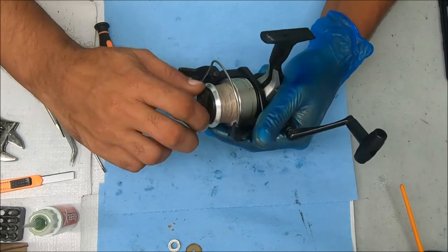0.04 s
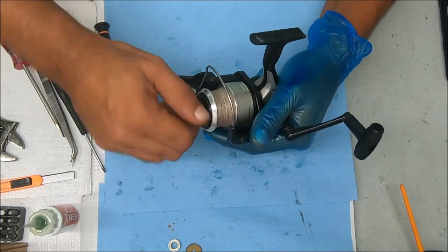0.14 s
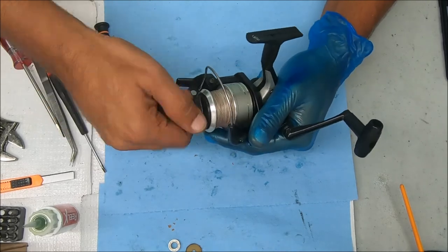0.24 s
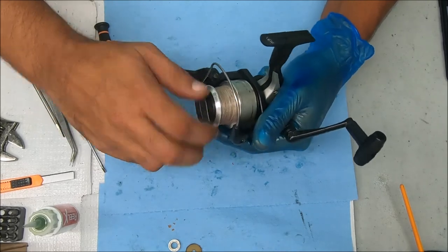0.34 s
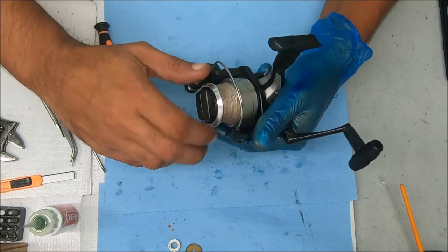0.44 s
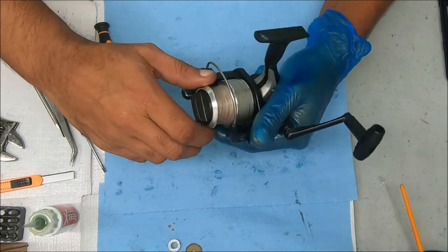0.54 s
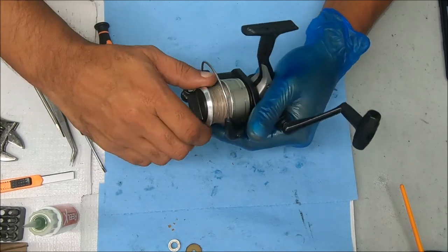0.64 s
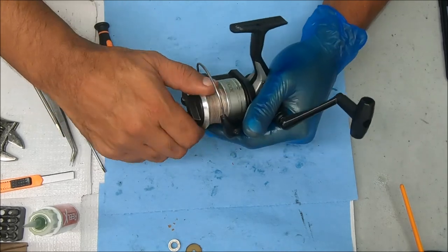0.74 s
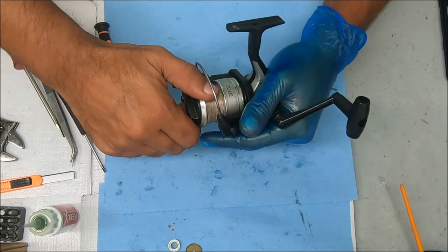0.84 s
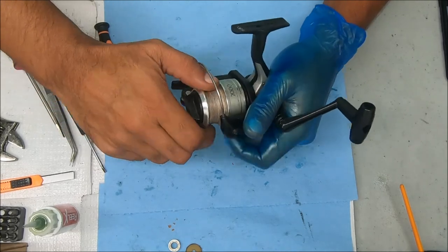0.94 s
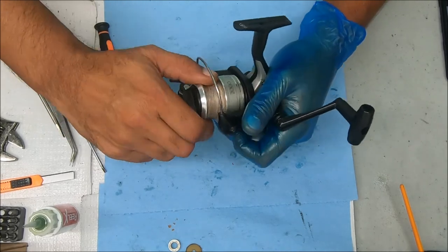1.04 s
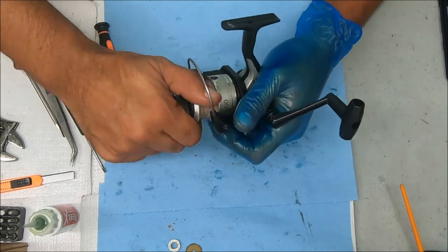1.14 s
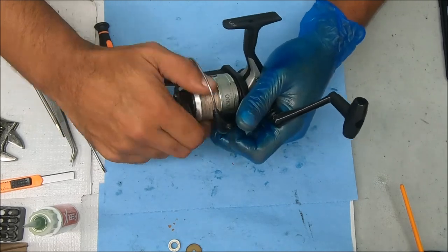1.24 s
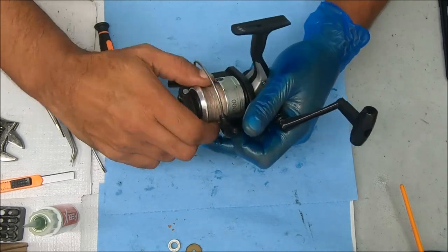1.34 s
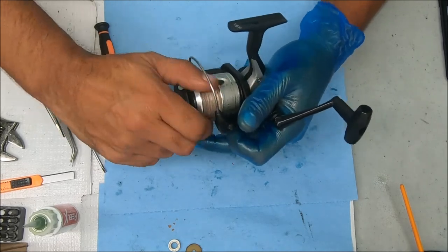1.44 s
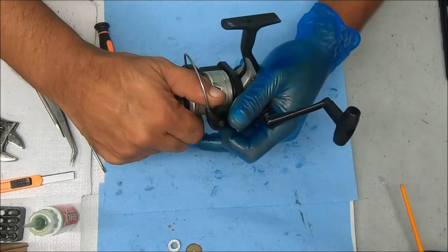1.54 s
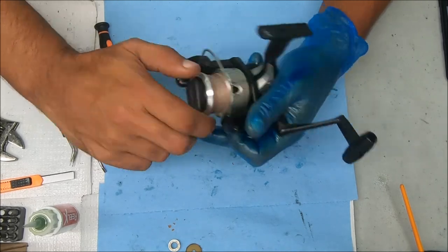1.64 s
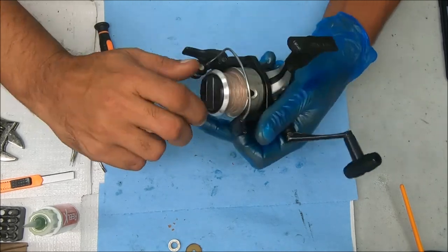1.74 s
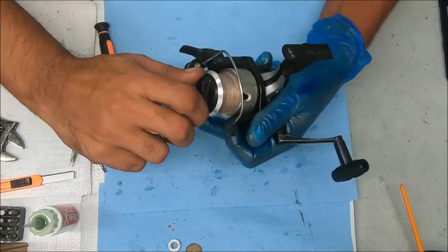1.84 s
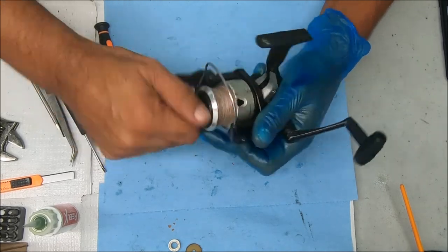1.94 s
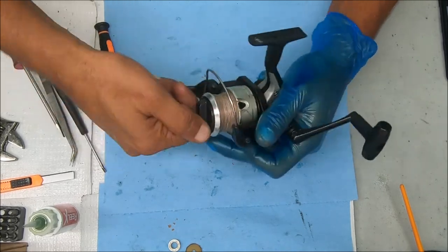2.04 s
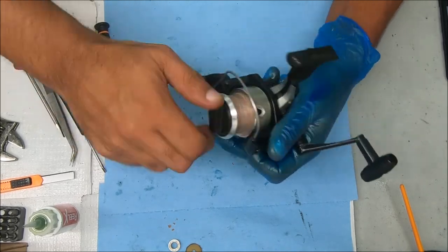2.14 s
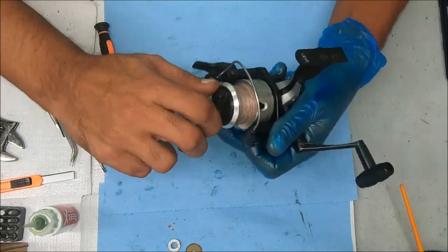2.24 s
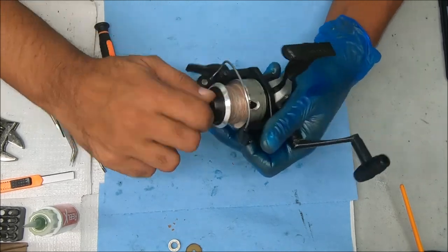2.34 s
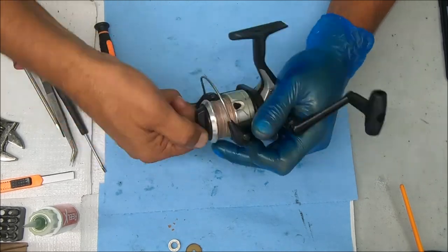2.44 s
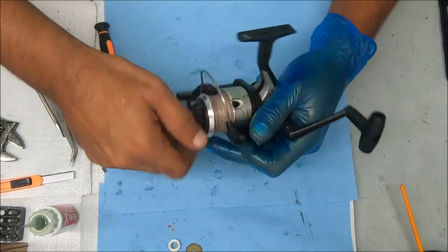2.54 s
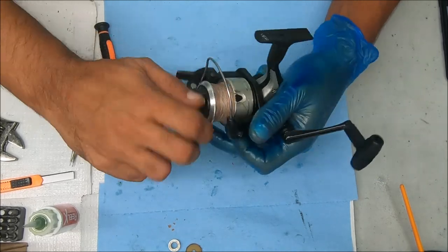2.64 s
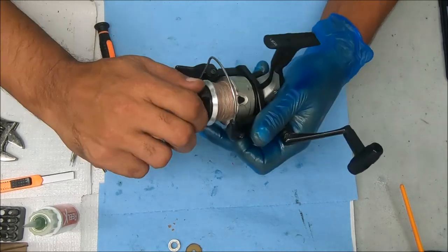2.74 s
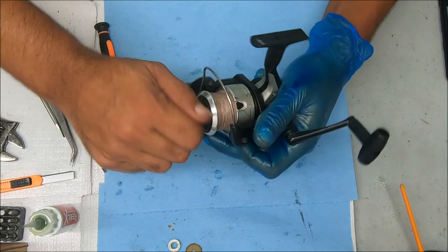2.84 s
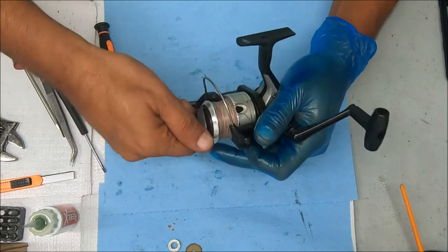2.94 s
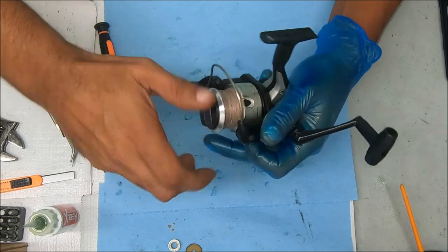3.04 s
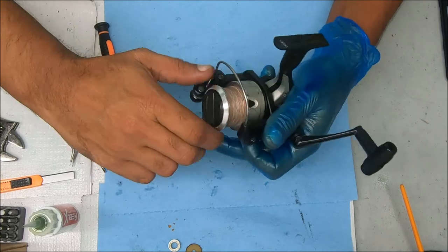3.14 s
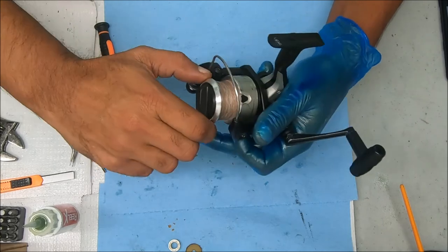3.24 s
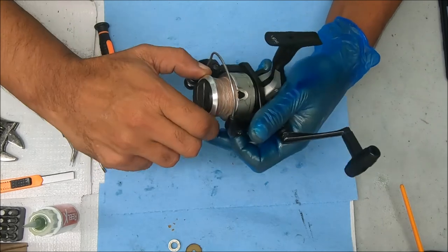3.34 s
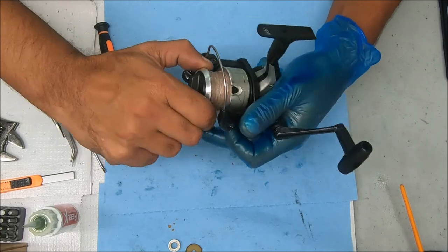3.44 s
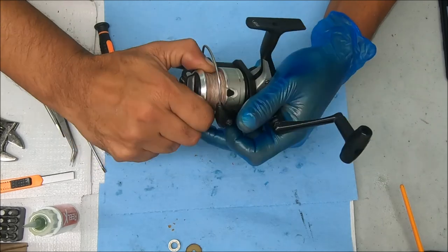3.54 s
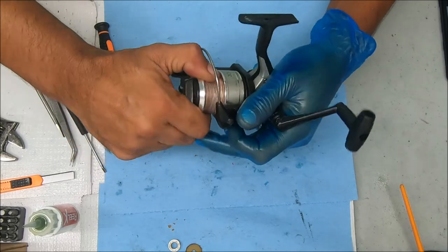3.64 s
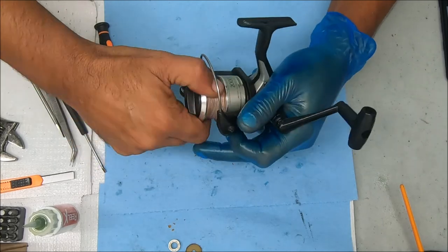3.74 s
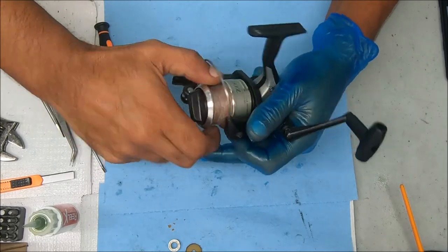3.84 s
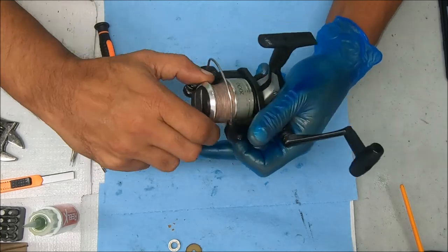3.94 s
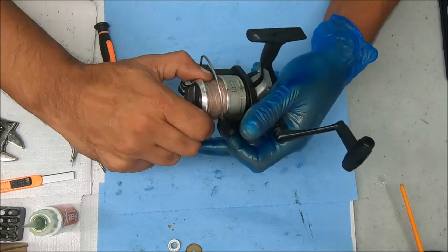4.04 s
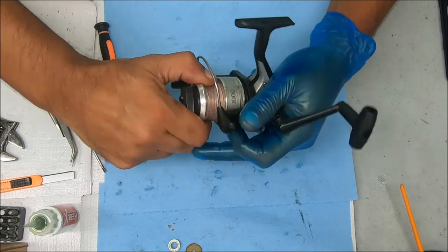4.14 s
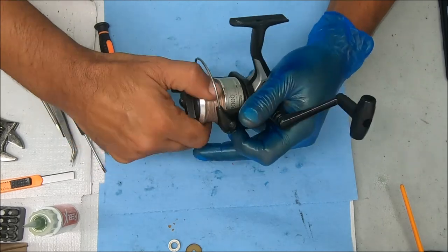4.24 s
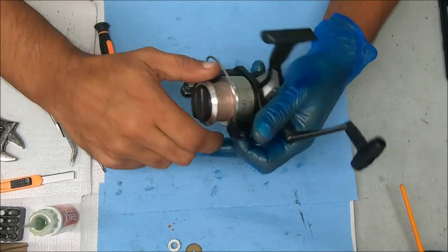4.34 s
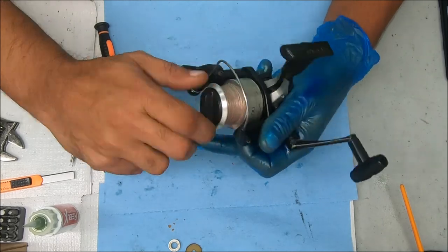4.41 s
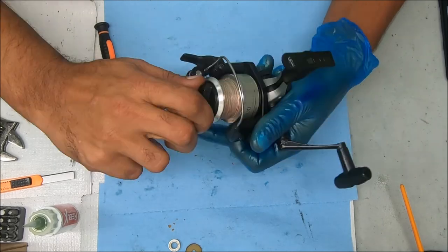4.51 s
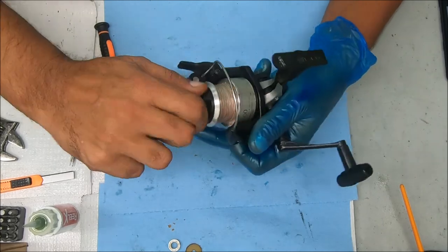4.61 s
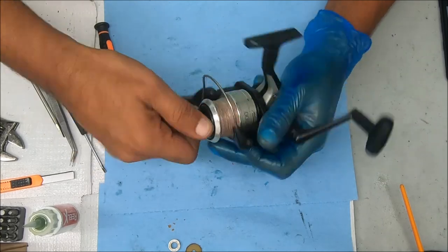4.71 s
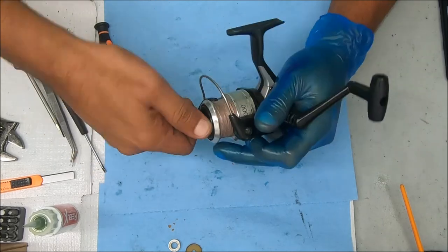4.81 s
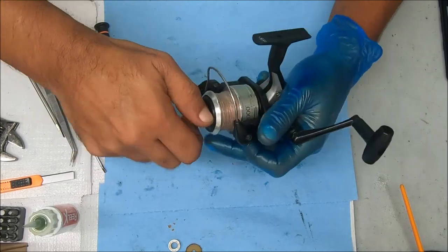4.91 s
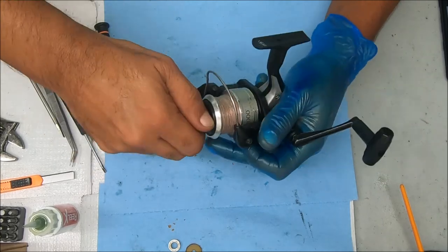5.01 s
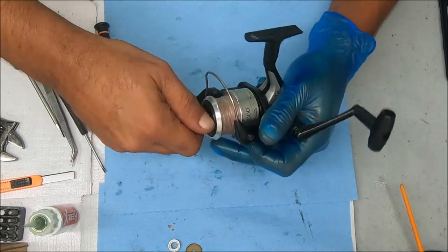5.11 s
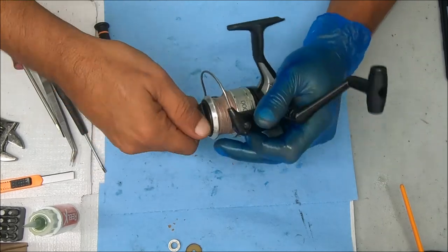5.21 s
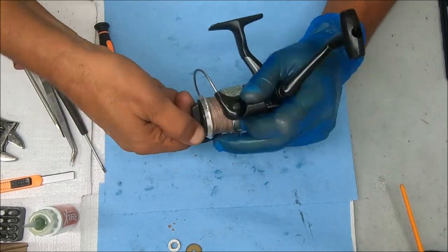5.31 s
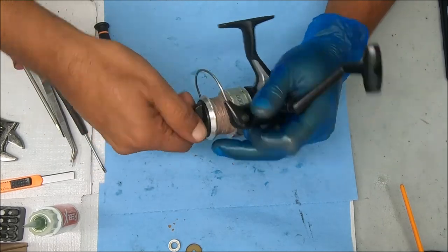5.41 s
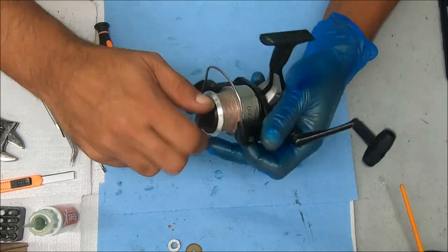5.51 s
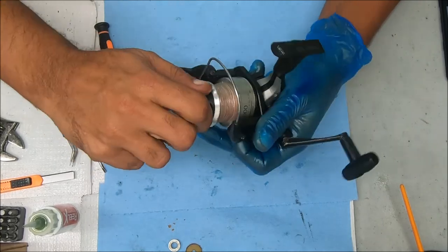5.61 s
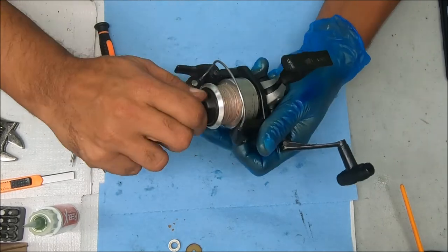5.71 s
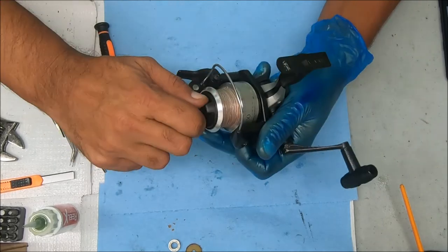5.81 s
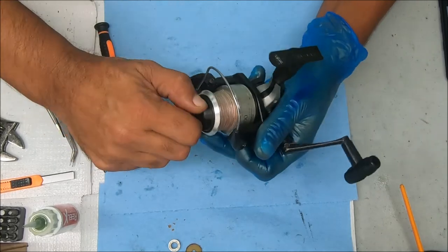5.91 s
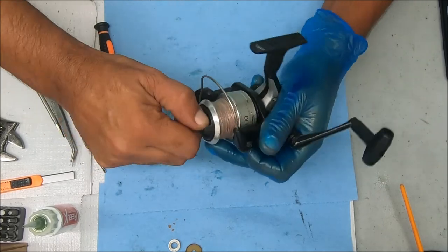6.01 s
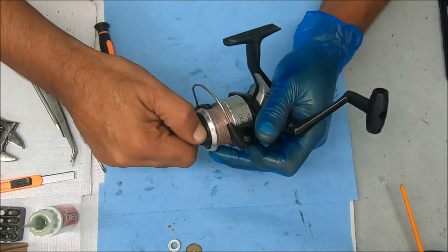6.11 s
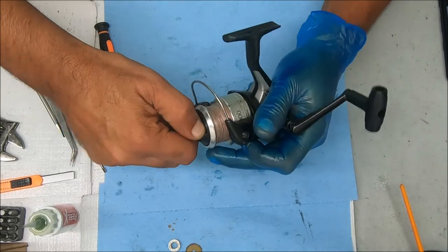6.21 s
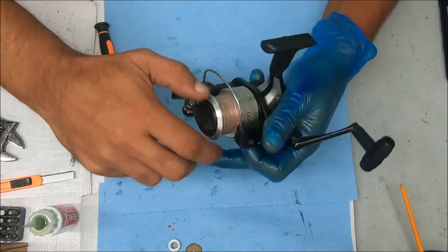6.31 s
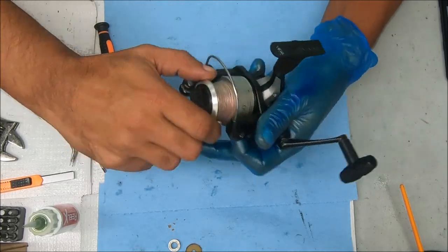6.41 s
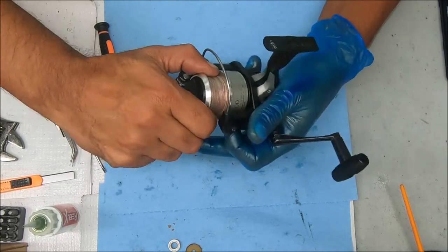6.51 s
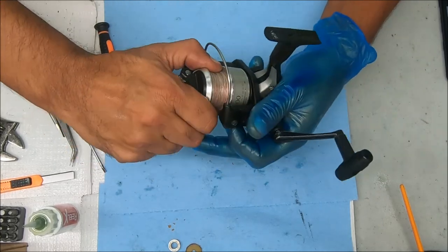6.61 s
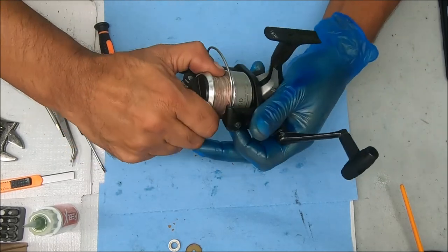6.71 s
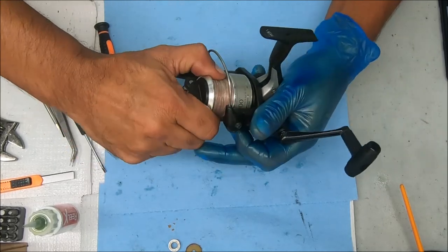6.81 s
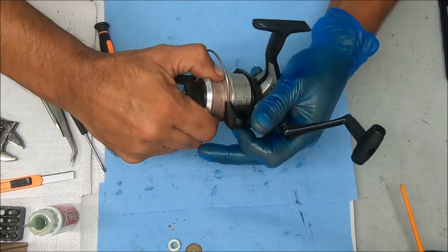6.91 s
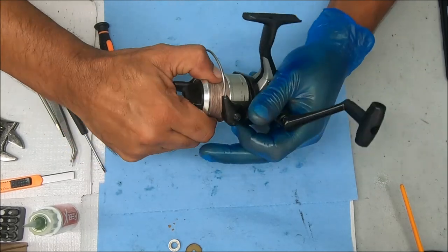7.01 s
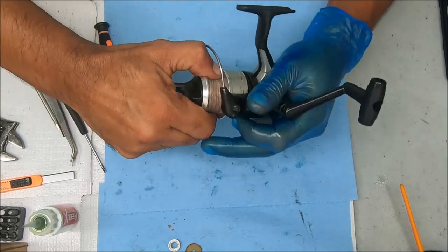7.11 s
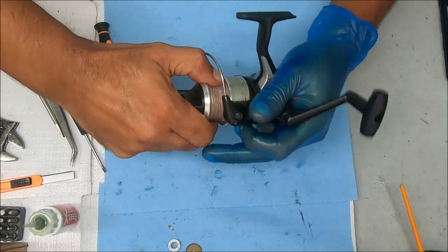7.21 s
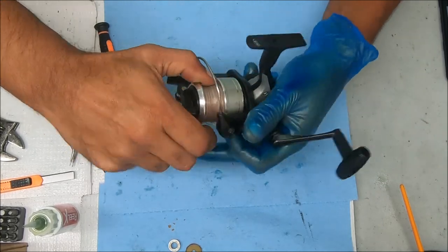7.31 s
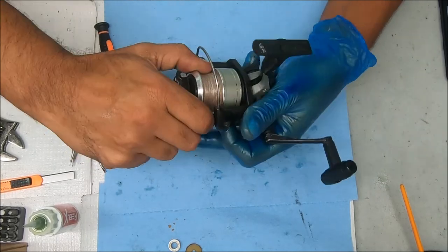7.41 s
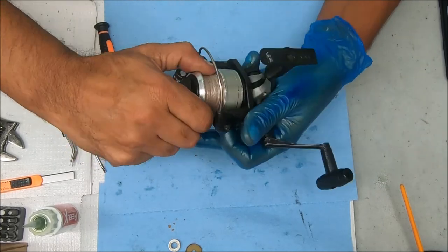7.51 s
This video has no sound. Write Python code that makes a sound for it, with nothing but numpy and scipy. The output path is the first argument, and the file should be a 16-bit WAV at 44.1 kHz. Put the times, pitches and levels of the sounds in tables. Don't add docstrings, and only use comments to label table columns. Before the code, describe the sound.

Close-up crisp ratcheting bursts from a fishing reel, with sparse metallic spool clicks, dull taps and soft skin rubs above a quiet motor hum.

```python
import sys
import numpy as np
from scipy import signal
from scipy.fft import rfft, irfft
from scipy.io import wavfile
from scipy.ndimage import uniform_filter1d

SR = 44100
rng = np.random.default_rng(int(sys.argv[2]) if len(sys.argv) > 2 else 0)


def convert_level_to_amplitude(level_db):
    exponent = np.asarray(level_db, float) / 20
    return 10 ** exponent


def bounce(signal):
    frames = np.transpose(np.atleast_2d(signal))
    limited = np.clip(frames, -1, 1)
    pcm = np.round(limited * 32767).astype(np.int16)
    wavfile.write(sys.argv[1], SR, pcm)


N = 333307

# start in seconds, peak in dB, then the ring of rim, skirt and lip in dB.
CLICKS = [(0.8822, -25, -58, -46, -34), (1.2038, -21.5, -50, -56, -39), (1.2465, -20.5, -48, -50, -42),
          (1.562, -22, -36.5, -71, -32), (1.6061, -22, -37, -69, -32), (3.701, -21, -42.5, -50, -42),
          (3.7483, -20.5, -56, -44, -44), (3.8188, -21.5, -45, -47, -38), (4.24, -22.5, -46, -45.5, -33),
          (4.287, -22, -42, -45.5, -29), (7.0672, -22.5, -49.5, -68, -33)]
# frequency in Hz, level in dB.
SKIN_COLOUR = [(3000, -6), (5000, -7), (7500, 2), (9500, 1), (12500, -11), (16000, -16)]


def evened(x):
    return x / np.sqrt(np.mean(x ** 2) + 1e-20)


def peaked(x):
    return x / (abs(x).max() + 1e-20)


def read(points, hz):
    f, value = np.transpose(points)
    return np.interp(np.log(hz + 1), np.log(f + 1), value)


def add(mix, s, sound):
    part = mix[..., round(s * SR):][..., :sound.shape[-1]]
    part += sound[..., :part.shape[-1]]


def noise(length, spectrum):
    hz = np.fft.rfftfreq(length, 1 / SR)
    inside = (hz > spectrum[0][0]) & (hz < 1.1 * spectrum[-1][0])
    white = rfft(rng.standard_normal(length))
    return evened(irfft(white * convert_level_to_amplitude(read(spectrum, hz)) * inside, length))


def ring(hz, t60, rise=0.00071):
    t = np.arange(int((0.05 + t60) * SR)) / SR
    return np.sin(2 * np.pi * hz * t) * convert_level_to_amplitude(-60 * t / t60) * (1 - np.exp(-t / rise))


def snap(spectrum, t60):
    t = np.arange(2048) / SR
    return noise(len(t), spectrum) * convert_level_to_amplitude(-60 * t / t60) * (1 - np.exp(-t / 0.00043))


def cluster(hz, spread, t60):
    detune = 1 + spread * (np.linspace(-1.5, 1.5, 10) + rng.uniform(-0.15, 0.15, 10))
    share = rng.uniform(-0.5, 1, 10) * np.hanning(14)[2:-2]
    life = rng.uniform(0.32, 1, 10)
    modes = [a * ring(hz * d, t60 * k)[:2048] for d, a, k in zip(detune, share, life)]
    return peaked(sum(modes))


def knock(low_db, wide_db, high_db):
    # frequency in Hz, t60 in seconds.
    housing = [(1690, 0.04), (2500, 0.025), (3350, 0.026)]
    # frequency in Hz, level in dB.
    clack = [(800, -23), (1300, -22.5), (1700, -5), (2400, 5.5), (3400, -7), (4300, -11), (5500, -33.5)]
    levels_db = low_db, wide_db - 3.5, high_db
    tones = sum(convert_level_to_amplitude(db) * cluster(hz, 0.046, t60) for db, (hz, t60) in zip(levels_db, housing))
    return tones + convert_level_to_amplitude(wide_db) * peaked(snap(clack, 0.02))


def both(sound):
    blurred = sound * convert_level_to_amplitude(-60 * np.arange(len(sound)) / (0.009 * SR))
    return np.array([sound, blurred * np.linalg.norm(sound) / np.linalg.norm(blurred)])


def hum():
    # frequency in Hz, rms level in dB.
    lines = [(11.91, -38), (43.3, -52), (116.96, -49), (119.87, -50), (351.02, -74), (526.6, -70)]
    # time in seconds, pitch in Hz, level in dB.
    engine_path = [
        (2.37, 74.3, -75),
        (2.96, 70.8, -54),
        (3.14, 72.6, -41),
        (3.54, 69, -40),
        (4.17, 64.4, -47),
        (4.3, 64.2, -48.5),
        (4.66, 61.7, -53),
        (4.78, 58, -71),
    ]
    in_step_s = 1.29
    t = np.arange(N) / SR
    motors = sum(convert_level_to_amplitude(db) * np.cos(2 * np.pi * hz * (t - in_step_s)) for hz, db in lines)
    s, hz, db = np.transpose(engine_path)
    fade = np.interp(t, [s[0] - 0.3, s[0], s[-1], s[-1] + 0.33], [0, 1, 1, 0])
    phase = 2 * np.pi * np.cumsum(np.interp(t, s, hz)) / SR
    engine = fade * convert_level_to_amplitude(np.interp(t, s, db)) * np.sin(phase)
    return np.sqrt(2) * (motors + engine)


def rumble():
    # frequency in Hz, level in dB.
    colour = [(5, -6), (20, 2.5), (32, -8), (44, 0), (55, -10.5), (85, -19), (110, -15.5), (150, -33.5)]
    return convert_level_to_amplitude(-41.5) * noise(N, colour)


def air():
    # frequency in Hz, level in dB per Hz.
    colour = [(76, -26.5), (130, -6), (172, -13), (223, -16.5), (284, -14), (529, -18.5), (687, -23.5),
              (892, -21), (1410, -28), (2070, -29), (2480, -32), (7780, -38), (15700, -40.5)]
    return convert_level_to_amplitude(-57) * noise(N, colour)


def taps():
    # start in seconds, level in dB, high over low resonance in dB.
    loose_parts = [(0.0118, -39, -2), (0.0682, -46, 3.5), (0.3576, -48.5, 1), (0.394, -49, 10),
                   (0.4279, -44.5, -4.5), (0.4607, -37, -17), (0.4892, -32.5, -4), (1.1566, -46, -15),
                   (1.3324, -47, -8), (1.507, -53.5, -9), (1.8398, -42.5, 5), (1.903, -30.5, 15),
                   (2.178, -51, -1), (2.2182, -45, 3.5), (2.2528, -46.5, -10), (2.3266, -45, -13.5),
                   (2.372, -42, 16.5), (2.6726, -28.5, -4.5), (2.813, -46, -4), (2.837, -34, 22.5),
                   (2.8408, -28, 17), (2.8603, -46.5, 9), (4.1135, -60, -2), (4.3804, -48, -25),
                   (5.6453, -51, 0), (5.7882, -53.5, 2)]
    # start in seconds, clack in dB, tick in dB.
    fingertips = [
        (0.8082, -59, -43),
        (1.0101, -60, -45),
        (5.5305, -30, -39.5),
        (5.661, -47, -52),
        (6.475, -52, -52),
        (6.7445, -32, -39),
        (7.3254, -52.5, -51),
    ]
    # frequency in Hz, level in dB.
    thud = [(800, -14), (1300, 5), (2500, 9), (4500, -6.5), (6000, -23)]
    clack_db, tick_db = -1, -16.5
    pure = 0.35
    out = np.zeros((2, N))
    for s, db, tilt_db in loose_parts:
        body = knock(-max(tilt_db, 0), clack_db - pure * abs(tilt_db), min(tilt_db, 0))
        tick = convert_level_to_amplitude(tick_db) * peaked(snap(SKIN_COLOUR, 0.012))
        add(out, s, convert_level_to_amplitude(db) * both(body + tick))
    for s, db, touch_tick_db in fingertips:
        body = convert_level_to_amplitude(db) * peaked(snap(thud, 0.019))
        tick = convert_level_to_amplitude(touch_tick_db) * peaked(snap(SKIN_COLOUR, 0.012))
        add(out, s, both(body + tick))
    return out


def knob(notches, spread, wide, wide_db, upper_db, low_db, mid_db, high_db):
    rest_s = 0.2
    jerk_db = 8
    scatter_db = 2
    crack_db, crack_t60_s = -1.5, 0.0017
    out = np.zeros((2, N))
    first = np.diff([row[0] for row in notches], prepend=-rest_s) > rest_s
    odd = scatter_db * rng.uniform(-1.04, 1, (len(notches), 3))
    for (s, db, cap_hz), jerk, (a, b, c) in zip(notches, jerk_db * first, odd):
        cap = cluster(cap_hz, spread, 0.02)
        cap = cap + convert_level_to_amplitude(upper_db + a) * cluster(12200, 0.64 * spread, 0.017)
        strike = both(peaked(cap + convert_level_to_amplitude(wide_db) * snap(wide, 0.021)))
        crack = convert_level_to_amplitude(crack_db) * peaked(snap(wide, crack_t60_s))
        crack = np.array([crack, 0.8 * crack])
        add(out, s + 0.00082, convert_level_to_amplitude(db) * (strike + crack))
        add(out, s + 0.001, both(knock(low_db + b - 0.4 * jerk, mid_db + c, high_db + c + jerk)))
    return out


def turning():
    # start in seconds, peak in dB, cap resonance in Hz.
    tightening = [(0.16, -15.5, 6900), (0.184, -11, 7320), (0.1972, -15, 7600), (0.211, -15.5, 7160),
                  (0.2332, -10.5, 7180), (0.2585, -12, 7840), (0.2871, -13.5, 7620), (1.9732, -9, 7680),
                  (1.9863, -11.5, 7270), (2.0002, -12.5, 7300), (2.0147, -9, 7700), (2.0318, -12, 7330),
                  (2.0507, -12, 7740), (2.0698, -10, 7280), (2.0892, -12.5, 7700), (2.4063, -11, 7350),
                  (2.4362, -11.5, 7800), (2.4596, -8, 8040), (2.4784, -17, 7000), (2.4936, -9.5, 7530),
                  (2.5072, -11, 7550), (2.5193, -17.5, 7520), (2.5331, -10.5, 7820), (2.5531, -12.5, 7340)]
    # seconds, peak in dB, cap in Hz.
    firm_grip = [(2.9179, -15, 6900), (2.9369, -12, 7700), (2.9527, -14, 7540), (2.9706, -10.5, 7740),
                 (2.9917, -13.5, 6900), (3.015, -8, 7670), (4.7171, -14.5, 7470), (4.7451, -14.5, 7800),
                 (4.775, -14.5, 7350), (4.7945, -13, 7570), (4.8134, -11, 7670), (4.8362, -15, 7750)]
    # start in seconds, peak in dB, cap resonance in Hz.
    loosening = [
        (5.2753, -17, 8670),
        (5.342, -14.5, 8510),
        (5.374, -16, 8300),
        (5.4179, -18.5, 8150),
        (6.0482, -15.5, 8600),
        (6.0975, -16.5, 8300),
        (6.169, -14.5, 7920),
    ]
    # frequency in Hz, level in dB.
    tight_snap = [(2500, -35), (4000, -25), (5500, -13), (9500, -10), (14500, -17), (16500, -25.5)]
    # frequency in Hz, level in dB.
    loose_snap = [(2500, -42), (4000, -32), (6000, -12.5), (7000, -9), (10000, -4.5), (14500, -22),
                  (16500, -14.5)]
    out = (knob(tightening, 0.065, tight_snap, wide_db=-9, upper_db=-1, low_db=-34.5, mid_db=-42, high_db=-37.5)
           + knob(firm_grip, 0.068, tight_snap, wide_db=-9, upper_db=-8, low_db=-37, mid_db=-41, high_db=-44.5)
           + knob(loosening[:4], 0.107, loose_snap, wide_db=-4.5, upper_db=-2,
                  low_db=-36.5, mid_db=-36, high_db=-46)
           + knob(loosening[4:], 0.092, loose_snap, wide_db=0, upper_db=0,
                  low_db=-40, mid_db=-36.5, high_db=-64))
    earlier = cluster(7500, 0.08, 0.008) + 0.7 * cluster(12200, 0.05, 0.011)
    add(out[1], 0, convert_level_to_amplitude(-36.5) * earlier)
    return out


def slides():
    # loudest moment, swell and fade in seconds, level in dB.
    rubs = [(.804, 0.11, .07, -57), (.95, 0.0091, .05, -67), (1.014, 0.038, 0.035, -54),
            (1.08, 0.076, .12, -62.5), (1.31, .01, .03, -62), (1.36, .015, 0.074, -63),
            (1.914, .03, .03, -67), (3.89, .01, 0.09, -63), (3.96, 0.0094, .07, -65),
            (4.43, .1, .06, -61.5), (5.22, 0.011, .015, -65), (5.535, 0.013, 0.081, -56),
            (5.81, 0.022, 0.05, -53), (6.366, 0.046, 0.082, -57.5), (6.75, 0.0049, .03, -64),
            (7.374, .1, .045, -62.5)]
    # moment of letting go and swell in seconds, level in dB.
    creeps = [
        (.872, .016, -52),
        (1.195, .1, -53.5),
        (1.558, .014, -49),
        (1.965, .018, -43.5),
        (2.398, .035, -49),
        (3.693, .016, -54),
        (4.23, .027, -54),
        (5.268, .028, -51),
    ]
    let_go_s, faint_db = 0.005, -18
    out = np.zeros(N)
    for s, swell, fade, db in rubs + [(s, swell, let_go_s, db) for s, swell, db in creeps]:
        swell, fade = np.clip(swell, 0.003, s), max(fade, 0.003)
        slow, hiss = rng.standard_normal(SR // 3), noise(SR // 3, SKIN_COLOUR)
        t = np.arange(-swell, fade, 1 / SR)[:SR // 3]
        grain = convert_level_to_amplitude(2.2 * evened(uniform_filter1d(slow, size=90)))
        shape = convert_level_to_amplitude(db + faint_db * np.maximum(-t / swell, t / fade))
        shape = shape * signal.windows.tukey(len(t), 0.15)
        add(out, s - swell, shape * evened(grain * hiss)[:len(t)])
    return out


def spool():
    # frequency in Hz, level in dB.
    clicker = [(1470, -31.5), (2500, -16.5), (3510, -15.5), (4240, -24), (5130, -5), (5380, -1),
               (5770, -13), (8170, -5), (10600, -11.5), (11600, -7), (15400, -15), (16100, -28.5),
               (16500, -43.5)]
    out = np.zeros((2, N))
    for s, db, rim_db, skirt_db, lip_db in CLICKS:
        add(out, s + 0.00046, convert_level_to_amplitude(db) * both(peaked(snap(clicker, 0.016))))
        skirt = convert_level_to_amplitude(skirt_db + 13) * cluster(5200, 0.02, 0.04)
        add(out, s + 0.001, both(convert_level_to_amplitude(-42.5) * knock(-1.2, -11, -25.5) + skirt))
    return out


def spool_ring():
    # frequency in Hz, t60 in seconds, level in dB.
    metal = [(4764, .22, 0), (9300, .12, -8)]
    out = np.zeros(N)
    for s, db, rim_db, skirt_db, lip_db in CLICKS:
        for level_db, (hz, t60, share_db) in zip([rim_db, lip_db], metal):
            add(out, s + 0.002 * rng.random(), convert_level_to_amplitude(level_db + share_db) * ring(hz, t60, 0.0055))
    return out


def shop(straight, blurred, tail_db=-9):
    # frequency in Hz, t60 in seconds.
    decay = [(1000, 0.12), (2600, 0.46), (7000, 0.38), (12000, 0.31), (16000, 0.2)]
    # delay in seconds, level in dB.
    echoes = [(.0035, -18), (0.011, -16), (0.0152, -21.5)]
    bench_db, bench_t60_s = 1, 0.27
    hz, t, z = signal.stft(rng.standard_normal(SR // 2), SR, nperseg=128)
    tail = signal.istft(z * convert_level_to_amplitude(-60 * t / read(decay, hz)[:, None]), SR, nperseg=128)[1]
    t = np.arange(len(tail)) / SR
    tail *= 1 - np.exp(-t / 0.004)
    tail *= 1 + convert_level_to_amplitude(bench_db - 60 * t / bench_t60_s)
    wet = signal.oaconvolve(blurred, convert_level_to_amplitude(tail_db) * tail / np.linalg.norm(tail))[:N]
    for s, db in echoes:
        add(wet, s, convert_level_to_amplitude(db) * straight)
    return straight + wet


def scene():
    # frequency in Hz, level in dB.
    apart = [(200, -48), (400, -27), (700, -21), (1300, -25), (2400, -19), (4400, -25), (8000, -21.5),
             (15000, -22)]
    straight, blurred = turning() + spool() + taps()
    middle = shop(straight, blurred) + spool_ring() + slides()
    middle = middle + hum() + rumble() + air()
    hz, t, z = signal.stft(middle, SR, nperseg=256)
    turns = rng.random(z.T.shape).T
    scatter = np.exp(2j * np.pi * turns) * convert_level_to_amplitude(read(apart, hz) - 1.5)[:, None]
    side = signal.istft(z * scatter, SR, nperseg=256)[1][:N]
    return np.array([middle + side, middle - side])


def low_pass(x):
    return signal.sosfilt(signal.butter(12, 16810, fs=SR, output="sos"), x)


def record(dry):
    edge = signal.firwin(255, 15950, window=("kaiser", 7), fs=SR)
    mix = signal.oaconvolve(dry, edge[None], "same", axes=1)
    return low_pass(mix)


dry = scene()
out = record(dry)
bounce(out)
```